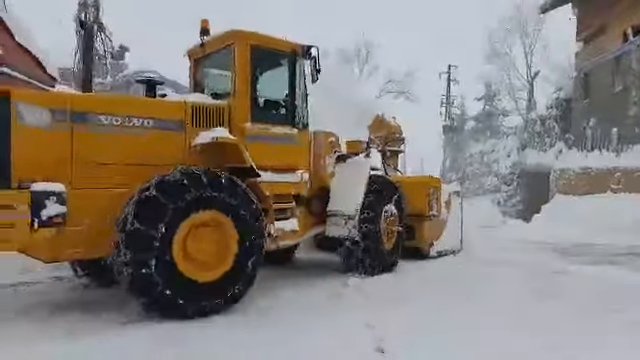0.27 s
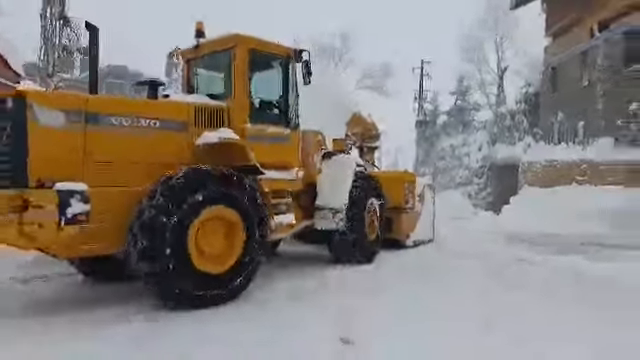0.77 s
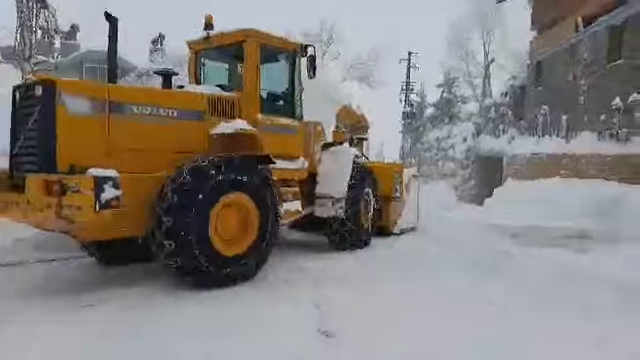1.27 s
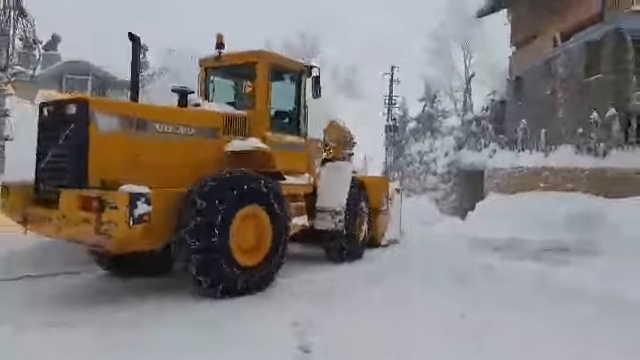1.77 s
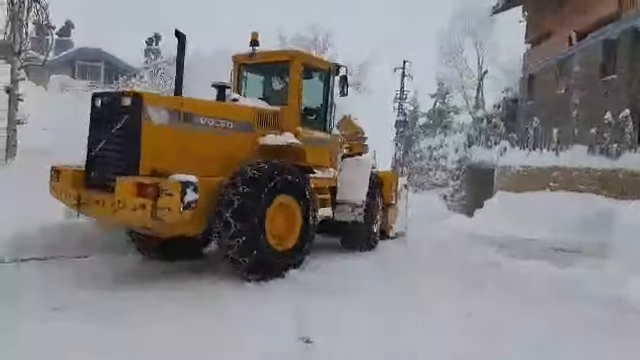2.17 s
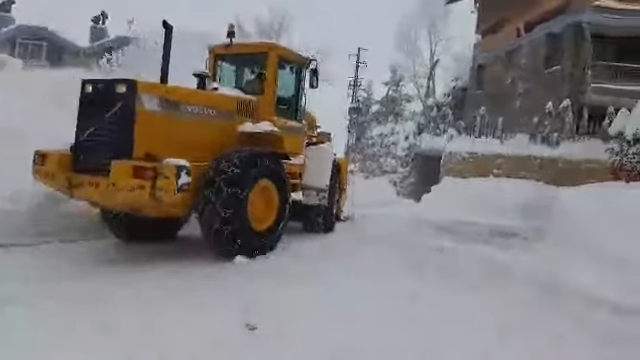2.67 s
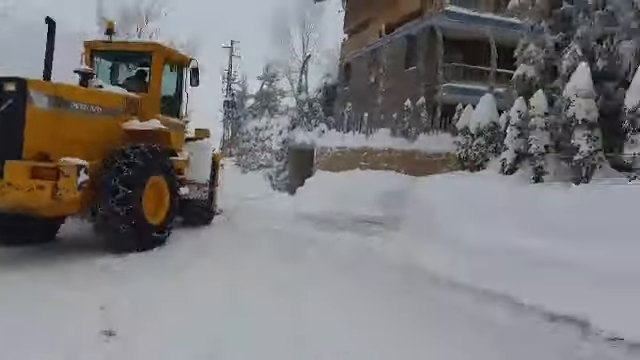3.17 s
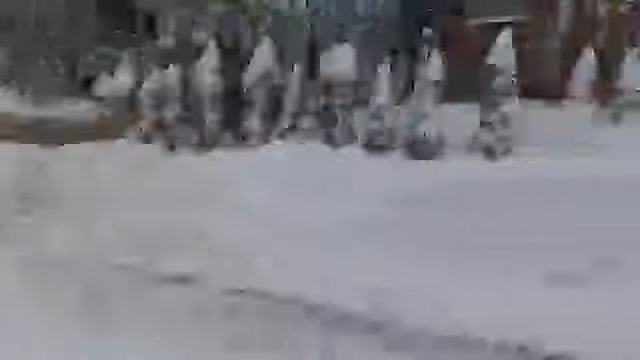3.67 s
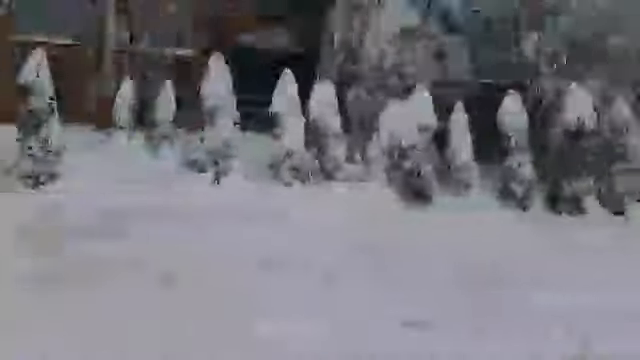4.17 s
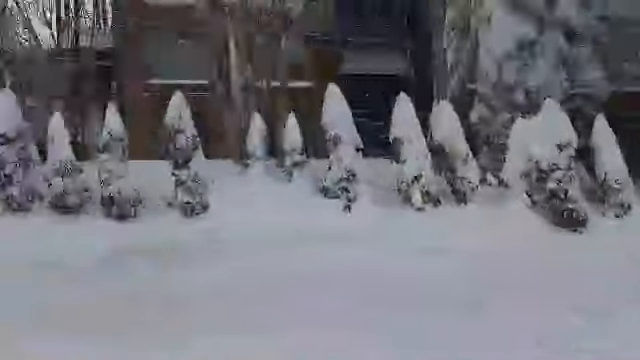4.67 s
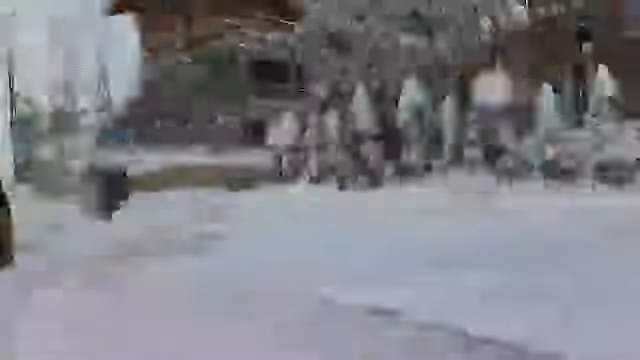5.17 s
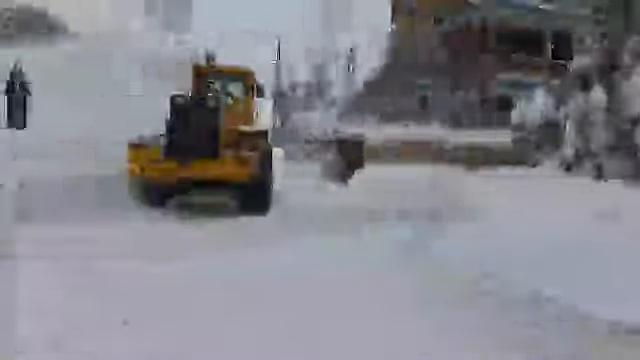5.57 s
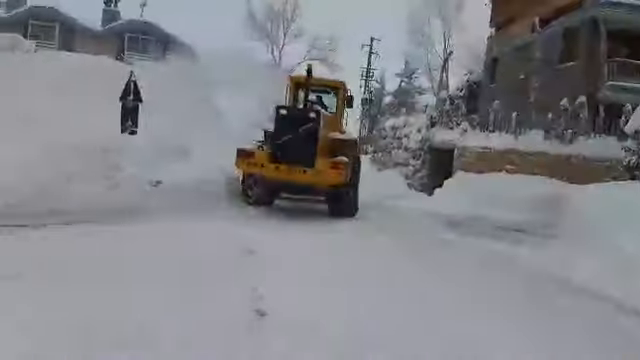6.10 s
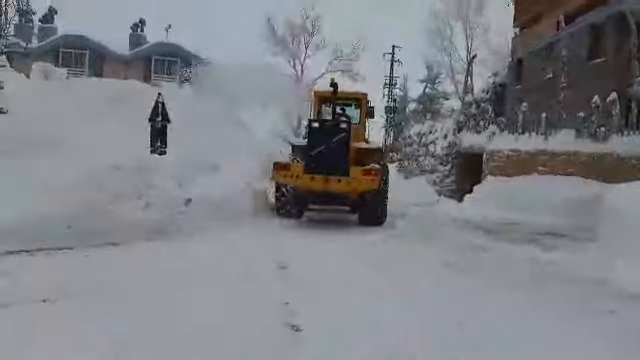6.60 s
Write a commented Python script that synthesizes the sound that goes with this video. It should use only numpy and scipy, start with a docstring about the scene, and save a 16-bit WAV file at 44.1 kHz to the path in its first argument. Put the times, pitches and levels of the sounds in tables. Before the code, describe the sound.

A big diesel wheel loader blowing snow works close by on a snowy street: low steady hum, rough blower roar, pump whine and hissing thrown snow. The drive engine revs up, then eases as the machine draws away. Wheel chains tink lightly. The hand-held phone swings aside and back, dulling the right side, and small wind puffs thud near the end.

```python
"""0 s: engine hum, blower roar, snow spray, pump whine, housing whirr; a turbo whistle sinks and ends by 2.9 s.
1-2.6 s: the snow surges and the drive engine of the wheel loader revs up, then eases; chain links tink to 4.7 s.
2.6 s on: the loader draws away; the hand-held phone swings aside and back, its right port late and shadowed.
5.6 s on: a rattle warbles, wind puffs (first at 3.1 s) hit the right port, bass dips, the mid roar drops at 6.6 s.
Rotating parts are sines on shaft angles; roar, rumble and snow are shaped stereo noise; links are decaying sines."""
import sys
import numpy as np
from scipy import signal
from scipy.fft import rfft, irfft, next_fast_len
from scipy.io import wavfile
from scipy.ndimage import uniform_filter1d, map_coordinates

SR = 44100
rng = np.random.default_rng(int(sys.argv[2]) if len(sys.argv) > 2 else 0)


def bounce(signal):
    """Save signal as a 16-bit WAV file at the path given by the first command-line argument."""
    frames = np.transpose(np.atleast_2d(signal))
    limited = np.clip(frames, -1, 1)
    pcm = np.round(limited * 32767).astype(np.int16)
    wavfile.write(sys.argv[1], SR, pcm)


N = 301627
TIME_S = np.arange(N) / SR

# Blower engine: (time [s], firing rate [Hz], left level [dB])
FIRING_HUM = [(0, 110.5, -18), (.15, 110.6, -15.5), (.6, 110.9, -13.5), (1.2, 110.6, -12.5),
              (1.5, 110, -15.5), (1.8, 109.6, -14.5), (2.2, 109.8, -10.5), (2.6, 110.5, -12.5),
              (3.0, 110.4, -12.5), (3.3, 110.9, -11), (3.8, 110, -11), (4.2, 110.4, -13.5),
              (4.5, 110.8, -13), (4.95, 111.2, -14.5), (5.3, 110.7, -12.5), (6.05, 109.2, -11),
              (6.14, 109.1, -11), (6.2, 109.5, -18), (6.35, 110, -17.5), (6.84, 110.1, -18.5)]
# Crank orders: (multiple of the two-turn cycle, level relative to LOUDNESS [dB])
CRANK_ORDERS = [(9, -18), (14, -15), (15, -19.5), (20, -18), (24, -18.5), (26, -12.5), (32, -21.5),
                (34, -28)]
# Twice the firing rate: (time [s], level [dB])
OCTAVE = [(0, -31.5), (1.1, -31.5), (1.3, -46), (1.5, -25), (1.8, -32), (2.05, -25.5), (2.22, -31),
          (2.45, -24), (2.7, -37), (3.2, -34), (3.6, -47), (5.3, -55), (5.6, -43), (6.1, -46), (6.84, -57)]
# Bass, left over right, scaled per layer: (time [s], lean [dB])
BASS_LEAN = [(0, 5), (.6, 5.5), (1.3, 5.5), (4.5, 6), (6.14, 6), (6.2, 1), (6.35, 3.5), (6.84, 0)]
# Roar as the loader draws away, before trim: (time [s], level [dB])
LOUDNESS = [(0, -22), (.4, -22.5), (1.0, -22), (1.5, -23), (2.0, -22.5), (2.6, -24), (3.3, -25),
            (3.9, -26.5), (4.7, -28), (5.1, -30), (5.3, -31), (5.55, -31.5), (5.8, -30), (6.2, -32),
            (6.58, -34), (6.63, -36), (6.84, -35)]
# Relative roar spectra, from the front, from behind, phone turned away: (frequency [Hz], level [dB])
ROAR_FRONT = [(250, -120), (340, -11), (400, -5.5), (510, -1.5), (640, -4.5), (780, -10), (1000, -8.5),
              (1500, -13), (1750, -15), (2000, -17.5), (2300, -18.5), (2550, -20.5), (2900, -39),
              (4000, -120)]
ROAR_BEHIND = [(250, -120), (340, -35), (400, -7), (500, -1), (640, -7), (900, -8.5), (1200, -10),
               (1600, -11), (1780, -12), (2000, -17.5), (2250, -16), (2500, -22), (2900, -28.5),
               (4000, -120)]
ROAR_ASIDE = [(250, -120), (340, -35), (400, -9), (520, -4.5), (720, -2.5), (870, -8.5), (1100, -7.5),
              (1400, -9.5), (1700, -14.5), (2250, -14.5), (2600, -20), (2900, -36), (4000, -120)]
# Late loss in the middle of the roar: (frequency [Hz], gain [dB])
HOLLOW = [(650, 0), (950, -6), (1550, -6), (1850, 0)]
# Scattered over direct sound: (time [s], roar side gain [dB], spray side gain [dB])
SPREAD = [(0, 2.5, -1), (1.35, 4, -1), (1.8, 4.5, 1.5), (2.4, 2, 0.5), (3.3, 0.5, 0.5), (3.9, -3, -1),
          (4.5, -2, -3), (4.9, 0, -1.5), (5.3, -2.5, -1.5), (5.75, 3, -2.5), (6.3, -3, -1), (6.84, 5, -6)]
# Port likeness before SPREAD: (frequency [Hz], left-right correlation)
ALIKE = [(40, 0.85), (130, 0.82), (300, 0.91), (700, 0.94), (1500, 0.74), (3000, 0.38), (6500, 0.24),
         (11000, 0.22), (15000, 0.3)]
# Relative spectra of thrown snow, coarse to fine: (frequency [Hz], level [dB])
SPRAY = [(1700, -120), (2400, -11), (2750, 0), (3300, 1.5), (3800, 0.5), (4200, 1), (5200, -3), (6200, -10),
         (7500, -17), (8300, -15), (10000, -120)]
JET = [(3500, -120), (4600, -7), (5500, -1), (6200, 1), (7300, 2.5), (7900, -2.5), (8500, -11), (9200, -40),
       (11000, -120)]
HISS = [(6500, -120), (8000, -40), (8700, -1), (10000, 0), (11800, 3), (14000, -1.5), (15400, -3)]
# Fine snow, before the jet's offset: (time [s], level [dB])
FINE_SPRAY = [(0, -38.5), (.5, -39.5), (1.0, -38.5), (1.55, -41.5), (1.9, -39), (2.4, -42.5), (3.3, -47.5),
              (4.2, -47), (4.8, -49.5), (5.4, -55), (5.65, -53.5), (6.1, -53.5), (6.45, -56.5), (6.84, -56)]
# Heavier throws: (centre [s], length [s], jet gain [dB])
SURGES = [(0.985, 0.37, 4), (1.301, 0.26, 3), (1.955, 0.7, 1.5)]
# Diesel knock ringing in the engine housing: (time [s], level [dB])
WHIRR = [(0, -41), (.25, -35.5), (.4, -40), (.55, -36.5), (.8, -43), (1.5, -42), (3, -60.5)]
# Its relative spectrum: (frequency [Hz], level [dB])
HOUSING = [(2500, -58), (2950, -2), (3120, -0.5), (3300, -1), (3900, -56)]
# Drive engine: (time [s], firing rate [Hz], firing [dB], gear tone [dB], its second [dB], its third [dB])
DRIVE = [(0, 75.9, -35, -48, -45, -51), (.5, 76.89, -35, -43, -39, -43), (.95, 79.94, -33, -40, -50, -47),
         (1.2, 84.25, -32, -40, -43, -49), (1.9, 90, -27, -30, -42, -51),
         (2.6, 96.76, -34, -33.5, -34, -58), (3.0, 95, -37, -38, -34.5, -39),
         (3.3, 95.3, -34, -45, -41, -48), (3.7, 93.5, -31, -41.5, -53, -43),
         (4.2, 91.76, -32, -32, -50, -42), (4.8, 87.4, -28, -33, -46, -41),
         (5.1, 84.2, -31, -35.5, -53, -37), (5.4, 79, -32, -33, -50, -44), (6, 77.05, -29, -45, -56, -51),
         (6.84, 76.96, -39, -50, -58, -57)]
# Husky tone: (time [s], frequency [Hz], level [dB])
WAVER = [(0, 518, -38), (1.0, 513, -31), (1.3, 525.4, -37), (1.9, 521.4, -30), (2.2, 528, -29.5),
         (2.45, 528, -52), (5.6, 505, -58), (5.8, 501, -33), (6.1, 505.5, -41.5), (6.45, 508, -39),
         (6.84, 507, -51)]
# Pump: (time [s], level [dB], second tone [dB])
PUMP = [(0, -23, -31.5), (.4, -25, -36), (.85, -25.5, -35), (1.2, -25.5, -35.5), (1.6, -35, -36),
        (1.85, -28, -41), (2.35, -31, -37.5), (2.75, -39, -38), (2.92, -27.5, -40), (3.1, -36.5, -45),
        (3.35, -29.5, -36.5), (3.6, -42, -49), (3.85, -34.5, -42), (4.3, -39.5, -43), (4.85, -37.5, -39),
        (5.1, -33.5, -38), (5.25, -40, -43), (5.55, -33, -42), (5.8, -34, -46), (6.2, -39, -51),
        (6.4, -33.5, -43.5), (6.84, -35, -49)]
# Its fourth tone: (time [s], level [dB])
PUMP_FOURTH = [(0, -41.5), (.9, -41), (1.3, -47), (1.87, -39.5), (3.3, -47), (3.5, -48), (4.0, -55),
               (4.55, -51), (4.85, -48), (5.35, -62), (5.68, -46), (6.2, -57), (6.55, -56), (6.84, -55)]
# Turbocharger whistle: (time [s], frequency [Hz], level [dB])
TURBO = [(0, 11910, -52), (.35, 11865, -52), (.6, 11885, -52), (1.0, 11850, -54), (1.25, 11860, -53),
         (1.4, 11735, -53), (1.57, 11520, -52), (1.78, 11490, -51), (1.9, 11555, -51), (2.1, 11525, -52),
         (2.4, 11500, -55), (2.55, 11330, -58), (2.7, 11170, -63), (2.9, 11000, -110)]
# Whistle, left over right: (time [s], lean [dB])
TURBO_LEAN = [(0, 1), (.8, 1), (1.2, 12), (1.6, 12), (2.0, 6), (2.9, 4)]
# Relative spectra of the machine rumble and deep street rumble: (frequency [Hz], level [dB])
RUMBLE = [(30, -120), (50, -11), (66, -2.5), (80, 4.5), (98, 4), (120, 0), (140, 5), (175, 0), (235, -2.5),
          (300, -2), (370, -12.5), (440, -18), (600, -120)]
GROUND = [(20, -26), (34, -16), (40, -5), (47, -7), (60, -9), (75, 4.5), (95, -39), (150, -120)]
# Brief bass dips: (centre [s], length [s], gain [dB])
DIPS = [(6.052, 0.022, -10), (6.175, .027, -28), (6.34, 0.014, -12), (6.593, 0.016, -11),
        (6.738, 0.021, -5)]
# Warbling rattle from behind the machine: (centre [s], frequency [Hz], level [dB])
CHATTER = [(5.62, 1380, -41), (5.625, 1683, -44), (5.65, 1570, -43), (5.69, 1670, -41), (5.74, 1560, -41),
           (5.745, 1390, -43), (5.78, 1680, -41), (5.85, 1786, -39), (5.86, 1725, -39), (5.87, 1380, -38),
           (5.92, 1550, -39), (5.94, 1380, -44), (6.0, 1585, -39), (6.1, 1580, -41), (6.12, 1395, -44),
           (6.185, 1370, -38), (6.28, 1570, -42), (6.41, 1530, -48), (6.5, 1710, -43), (6.57, 1700, -41)]
# Chain links: (time [s], left ring level [dB], frequency [Hz], left over right [dB])
TINKS = [(1.8241, -33, 11000, 6), (2.1081, -35, 11400, 2), (2.7005, -43, 10870, 0),
         (3.2546, -34.5, 10900, 7), (3.525, -44, 11720, 6.0), (3.7834, -46, 11700, 12),
         (4.4916, -27, 14300, 17.5), (4.7107, -35.5, 11500, 17)]
# Wind lumps, right port, before the low cut: (centre [s], level [dB], length [s])
PUFFS = [(3.074, -12, 0.029), (3.115, -11, 0.022), (3.163, -13, 0.025), (5.863, -16, 0.015),
         (5.884, -8, .016), (5.913, -7.5, 0.015), (5.939, -6.5, 0.011), (5.968, -10, 0.015),
         (5.983, -18, 0.025), (6.016, -13.5, 0.034), (6.071, -10.5, 0.038), (6.088, -19, 0.023),
         (6.111, -10.5, 0.014), (6.156, -17, .014), (6.182, -19, 0.022), (6.226, -13.5, 0.019),
         (6.28, -18, 0.014), (6.32, -19, .02), (6.528, -23, .012), (6.554, -14, .015), (6.576, -12.5, .012),
         (6.64, -22, 0.025), (6.683, -26, 0.014), (6.732, -12.5, 0.021)]
# Relative wind spectrum: (frequency [Hz], level [dB])
BUFFET = [(30, -25), (70, 9.5), (130, 2.5), (300, -1.5), (500, -13), (900, -27), (2000, -44), (4000, -120)]
# Phone swing: (time [s], right port delay [ms])
SWING = [(0, -0.088), (.7, -0.049), (1.1, -0.0075), (1.95, -0.0086), (2.07, 0.076), (2.75, 0.14),
         (3.15, 0.17), (3.45, 0.29), (3.85, 0.49), (4.92, 0.5), (5.2, 0.356), (5.34, 0.26), (5.62, 0.12),
         (5.9, 0.06), (6.2, 0.028), (6.84, -0.043)]
# Change with the phone turned away: (rumble [dB], coarse spray [dB], street rumble [dB])
ASIDE_DB = [1, 1.5, -4.5]

NEAR_DB = -22  # LOUDNESS close by
RUMBLE_DB, RUMBLE_FADES = -21, 0.59  # close by; dB lost per dB that the roar loses
SPRAY_DB, SPRAY_FADES = -35.5, 1.16
BEHIND_DB = 1.5  # coarse spray gain from behind the loader
SHADE_DB, SHADE_DB_PER_MS = 3.5, 5  # left over right, and growth with port delay; scaled per layer
KNOCK_DEPTH, LOPE_DEPTH, THROB_DEPTH = .45, .075, .045  # knock by firing; roar and rumble by cycle, by firing
HOLLOW_S, HOLLOW_FADE_S = 6.6, .03
PUMP_PER_FIRING, GEAR_PER_FIRING = 3.834, 2.66  # geared to the blower engine, to the drive engine
WAVER_DRIFT_HZ = 4.8
CHATTER_S, LINK_T60_S = 0.026, 0.077
BUFFET_LOW_HZ, TOP_HZ = 60, 15450  # wind low cut at the port; phone band limit


def amp(db):
    """Decibels to gain."""
    return np.exp(np.asarray(db) * np.log(10) / 20)


def unit(x):
    """x at rms 1."""
    return x / np.sqrt(np.mean(x ** 2) + 1e-20)


def along(points, hz):
    """(Hz, value) points on a log axis."""
    f, v = np.transpose(points)
    return np.interp(np.log(hz + 1), np.log(f + 1), v)


def curves(rows):
    """One value per sample for each column after the time."""
    s, *cols = np.transpose(rows)
    return [np.interp(TIME_S, s, c) for c in cols]


def wobble(rate_hz):
    """A smooth random curve through rate_hz knots a second."""
    coarse = np.arange(0, N + 48, 48)
    knots = rng.standard_normal(int(N * rate_hz / SR) + 4)
    return np.interp(np.arange(N), coarse, map_coordinates(knots, [coarse * rate_hz / SR]))


def filtered(x, response):
    """x times a response of frequency."""
    m = next_fast_len(N + SR // 2)
    return irfft(rfft(x, m) * response(np.fft.rfftfreq(m, 1 / SR)), m)[..., :N]


def rush(spectrum, patchy_db, pulse=1, spread=1):
    """Stereo noise of rms 1 with patches of random gain, partly shared by the ports."""
    z = signal.stft(rng.standard_normal((2, N)), nperseg=512)[2]
    field = uniform_filter1d(rng.standard_normal(z.shape[1:]), size=6, axis=0)
    field = uniform_filter1d(field, size=12, axis=1)
    patchy = z * amp(patchy_db * unit(field))
    pair = pulse * signal.istft(patchy, nperseg=512)[1][:, :N]

    def mid_side(hz):
        turn = np.arccos(np.clip(along(ALIKE, hz), -1, 1)) / 2
        return amp(along(spectrum, hz)) * [np.cos(turn), np.sin(turn)]

    mid, side = filtered(pair, mid_side)
    return unit(np.array([mid + spread * side, mid - spread * side]))


def tone(phase, db):
    """A sine of rms level db."""
    return np.sqrt(2) * amp(db) * np.sin(phase)


def shaded(pair, db):
    """The right port is db quieter."""
    return pair * amp([0 * db, -db])


def bump(s, length):
    """A flat-topped swell around s."""
    return np.exp(-np.minimum((2 * (TIME_S - s) / length) ** 6, 50))


def engine():
    """Six cylinders fire three times a turn: the firing hum, crank orders with octave, and the crank angle."""
    (hz, db), (lean_db,) = curves(FIRING_HUM), curves(BASS_LEAN)
    crank = 2 * np.pi * np.cumsum(hz) / SR / 3
    firing = 3 * crank + .05 * wobble(14)
    db = db + .5 * wobble(20)
    hum = np.array([tone(firing, db), tone(firing + 0.73, db - lean_db)])  # the ports differ in phase
    roar_db, = curves(LOUDNESS)
    orders = tone(2 * firing + 0.35 * wobble(14), curves(OCTAVE)[0] + 1.8 * wobble(8.2))
    for k, level_db in CRANK_ORDERS:
        orders += tone(k * crank / 2 + .5 * wobble(7.2), roar_db + level_db + 3.0 * wobble(5.5))
    return hum, orders, crank


def blower_roar(roar_db, turned, far, lope, surge, spread):
    """Blower noise; its colour crossfades from front to rear and as the phone turns aside."""
    aside = turned * np.pi / 2
    facing = np.cos(far) * rush(ROAR_FRONT, patchy_db=0.44, spread=spread)
    facing += np.sin(far) * rush(ROAR_BEHIND, patchy_db=1.5, spread=spread)
    roar = np.cos(aside) * facing + np.sin(aside) * rush(ROAR_ASIDE, patchy_db=1.5, spread=spread)
    roar = amp(roar_db - 0.84 + 0.4 * surge) * lope * roar
    hollow = np.clip((TIME_S - HOLLOW_S) / HOLLOW_FADE_S, 0, 1)
    return (1 - hollow) * roar + hollow * filtered(roar, lambda hz: amp(along(HOLLOW, hz)))


def thrown_snow(lost_db, turned, far, crank, surge, spread):
    """Coarse spray, finer jet and hiss: noise bands pulsed by the combustion clatter."""
    # swells with each firing, unevenly over one turn
    clatter = 1 + .065 * np.sin(3 * crank) + .03 * np.sin(crank) + .03 * np.sin(2 * crank + 1)
    flutter = 0.51 * wobble(14)  # clumps of snow shake the treble together
    spray_db = SPRAY_DB - SPRAY_FADES * lost_db + ASIDE_DB[1] * turned
    spray_db = spray_db + BEHIND_DB * np.sin(far) * (1 - turned) + 0.32 * surge + flutter
    spray = amp(spray_db) * rush(SPRAY, patchy_db=0.9, pulse=clatter, spread=spread)
    fine_db, = curves(FINE_SPRAY)
    throws_db = sum(db * bump(s, length) for s, length, db in SURGES)
    jet_db = fine_db + 2.5 + throws_db + flutter + 0.24 * wobble(19)
    jet = amp(jet_db) * rush(JET, patchy_db=1.6, pulse=clatter, spread=spread)
    hiss_db = fine_db + .3 * surge + flutter + .5 * wobble(12)
    hiss = amp(hiss_db) * rush(HISS, patchy_db=.8, pulse=clatter, spread=spread)
    return spray, jet, hiss


def housing_whirr(crank, spread):
    """Diesel knock rings in the engine housing: a noise band pulsed by firing."""
    knock = 1 + KNOCK_DEPTH * np.sin(3 * crank)
    return amp(curves(WHIRR)[0]) * rush(HOUSING, patchy_db=0.5, pulse=knock, spread=spread)


def drive_engine():
    """The drive engine's firing hum; its gear tone with two overtones, and a husky tone beside them."""
    hz, firing_db, *gear_db = curves(DRIVE)
    firing = 2 * np.pi * np.cumsum(hz) / SR
    phase = GEAR_PER_FIRING * firing + 0.2 * wobble(12)
    gear = sum(tone(k * (phase + .2 * wobble(22)), db + 2.5 * wobble(8))
               for k, db in enumerate(gear_db, start=1))
    hz, waver_db = curves(WAVER)
    hz = hz + WAVER_DRIFT_HZ * wobble(3)
    husky = 1.1 * wobble(26)
    waver = tone(2 * np.pi * np.cumsum(hz) / SR + husky, waver_db + 1.0 * wobble(13))
    hum = tone(firing + 0.11 * wobble(13), firing_db + 3.0 * wobble(4))
    return hum, gear + waver


def hydraulic_pump(crank):
    """A pump geared to the crank whines with three overtones."""
    phase = PUMP_PER_FIRING * 3 * crank
    (db, second_db), (fourth_db,) = curves(PUMP), curves(PUMP_FOURTH)
    pump = tone(phase + 0.16 * wobble(12) + 1.52 * wobble(3), db + 1.8 * wobble(9))
    for k, level_db in [(2, second_db), (3, fourth_db - 3), (4, fourth_db)]:
        pump += tone(k * (phase + .25 * wobble(20)), level_db + 2.5 * wobble(12))
    return pump


def turbocharger():
    """A thin whistle with slight pitch jitter."""
    hz, db = curves(TURBO)
    whistle = tone(2 * np.pi * np.cumsum(hz + 12 * wobble(60)) / SR, db + 2 * wobble(25))
    return np.array([whistle, whistle])


def low_rumble(lost_db, turned):
    """Machine and street rumble as low noise, split around 210 Hz into deep and upper."""
    rumble_db = RUMBLE_DB - RUMBLE_FADES * lost_db + ASIDE_DB[0] * turned + 1.7 * wobble(3.88)
    rumble = amp(rumble_db + 0.077 * wobble(2.9)) * rush(RUMBLE, patchy_db=0.85)
    ground_db = -32 + ASIDE_DB[2] * turned + 1.4 * wobble(4.5)
    rumble += amp(ground_db) * rush(GROUND, patchy_db=1.5)
    deep = filtered(rumble, lambda hz: 1 / (1 + (hz / 210) ** 4))
    return deep, rumble - deep


def bass_dips():
    """Gain that falls for a moment at each dip."""
    return amp(sum(db * np.exp(-(2 * (TIME_S - s) / length) ** 4) for s, length, db in DIPS))


def chatter():
    """Short soft-edged notes that hop between a few pitches."""
    out, t = np.zeros(N), np.arange(-SR // 10, SR // 10)
    for s, hz, db in CHATTER:
        bell = np.exp(-(2 * t / SR / CHATTER_S) ** 2)
        out[round(s * SR) + t] += bell * tone(2 * np.pi * (hz * t / SR + rng.random()), db)
    return out


def chains():
    """Each link gives a short tick and rings at a high pitch, with a weaker mode just below."""
    out, t = np.zeros((2, N + SR)), np.arange(SR // 10) / SR
    decay = amp(-60 * t / LINK_T60_S)
    for s, db, hz, lean_db in TINKS:
        ring = decay * (np.sin(2 * np.pi * hz * t) + 0.34 * np.sin(2 * np.pi * .945 * hz * t))
        tick = .12 * amp(-60 * t / .004) * np.diff(rng.standard_normal(len(t) + 2), 2)
        out[:, round(s * SR):][:, :len(t)] += amp([[db], [db - lean_db]]) * (ring + tick)
    return out[:, :N]


def wind():
    """Lumps of low turbulence for the right port alone."""
    noise = filtered(rng.standard_normal(N), lambda hz: amp(along(BUFFET, hz)))
    out, t = np.zeros(N), np.arange(-SR // 12, SR // 12)
    for s, db, length in PUFFS:
        bell, at = np.exp(-(2 * t / SR / length) ** 2), round(s * SR) + t
        lump = bell * noise[at]
        out[at] += amp(db) * lump * np.linalg.norm(bell) / np.linalg.norm(lump)
    return filtered(out, lambda hz: 1 - 1 / (1 + (hz / BUFFET_LOW_HZ) ** 4))


def scene():
    """The machine is shaded and shifted in time at the right port; wind and chains join at the ports."""
    (late_ms,), (roar_db,), (lean_db,) = curves(SWING), curves(LOUDNESS), curves(BASS_LEAN)
    shade_db = SHADE_DB + SHADE_DB_PER_MS * late_ms
    lost_db, turned = NEAR_DB - roar_db, np.clip(late_ms / .5, 0, 1)
    # a quieter roar means the loader shows its back from farther away
    far = np.clip((-25 - roar_db) / 5, 0, 1) * np.pi / 2
    roar_spread, spray_spread = amp(curves(SPREAD))
    surge = wobble(3.144)

    hum, orders, crank = engine()
    lope = 1 + LOPE_DEPTH * np.sin(crank / 2 + .6 * wobble(2)) + THROB_DEPTH * np.sin(3 * crank)
    roar = blower_roar(roar_db, turned, far, lope, surge, roar_spread)
    spray, jet, hiss = thrown_snow(lost_db, turned, far, crank, surge, spray_spread)
    spray += housing_whirr(crank, spray_spread)
    drive, gear = drive_engine()
    deep, upper = low_rumble(lost_db, turned)

    bass = hum + shaded(deep + drive, 1.7 * lean_db) + shaded(lope * upper, 0.09 * shade_db)
    middle = roar + orders + hydraulic_pump(crank) + gear + chatter()
    # the phone's body shades short waves most when it points away
    machine = bass_dips() * bass + shaded(middle, 0.82 * shade_db)
    machine += shaded(spray, -4.5 + 1.57 * shade_db)
    machine += shaded(jet, -8.5 + 2.57 * shade_db)
    machine += shaded(hiss, -9.0 + 2.8 * shade_db)
    machine += shaded(turbocharger(), curves(TURBO_LEAN)[0])
    heard_at = np.arange(N) - late_ms * SR / 1000
    right = map_coordinates(machine[1], [heard_at], order=3, mode="nearest")
    return np.array([machine[0], right + wind()]) + chains()


def record(dry):
    """The phone keeps nothing above its band limit."""
    return filtered(dry, lambda hz: hz < TOP_HZ)


dry = scene()
out = record(dry)
bounce(out)
```